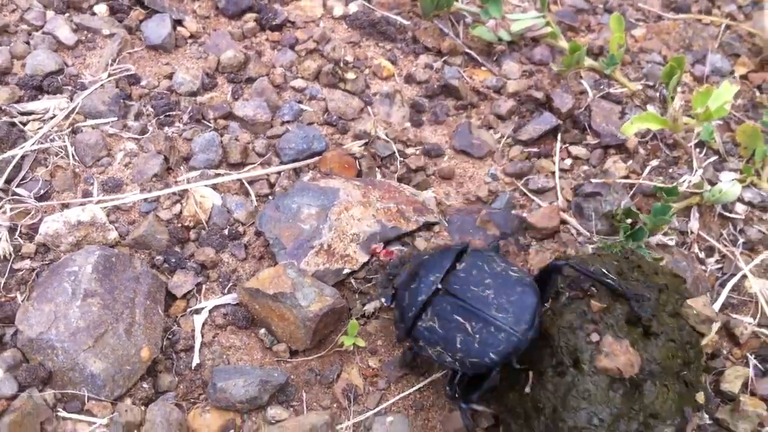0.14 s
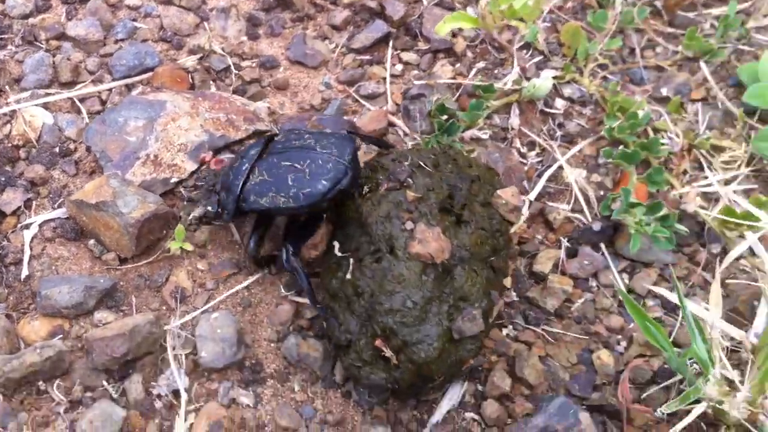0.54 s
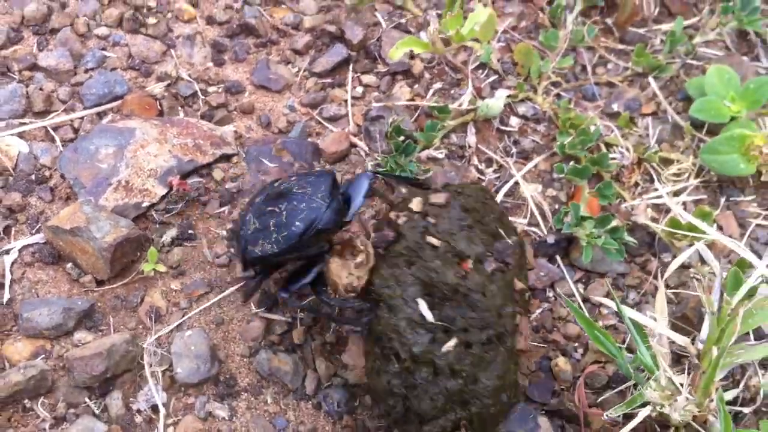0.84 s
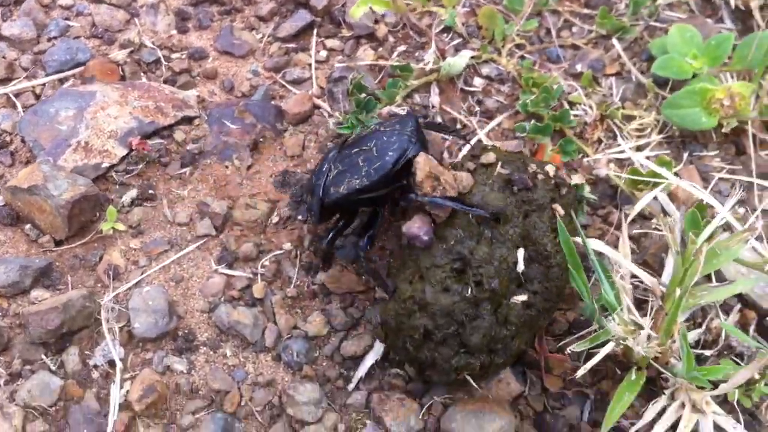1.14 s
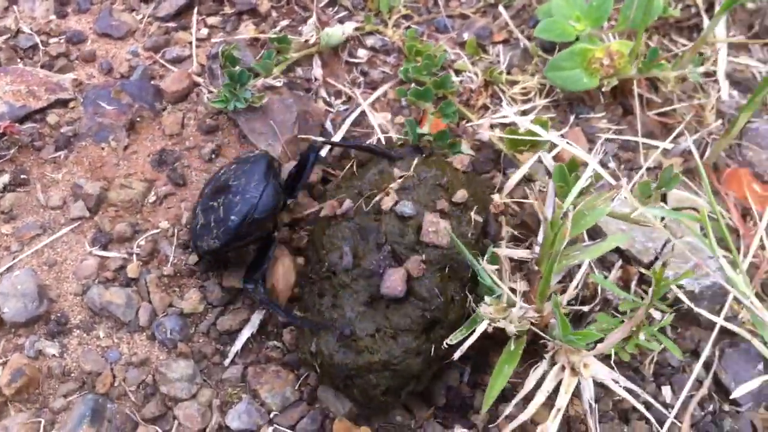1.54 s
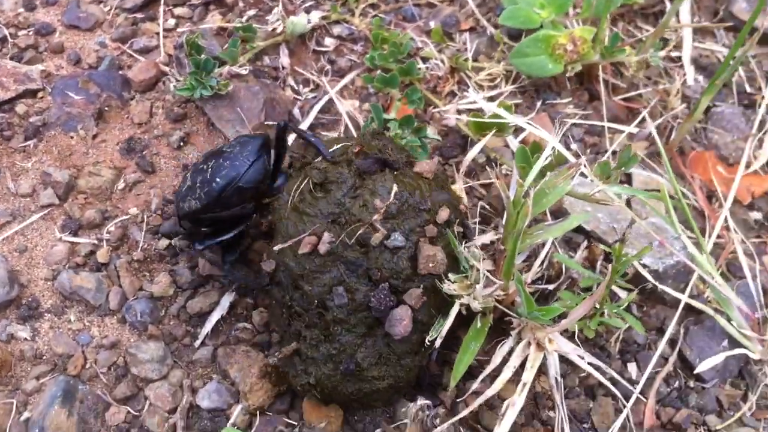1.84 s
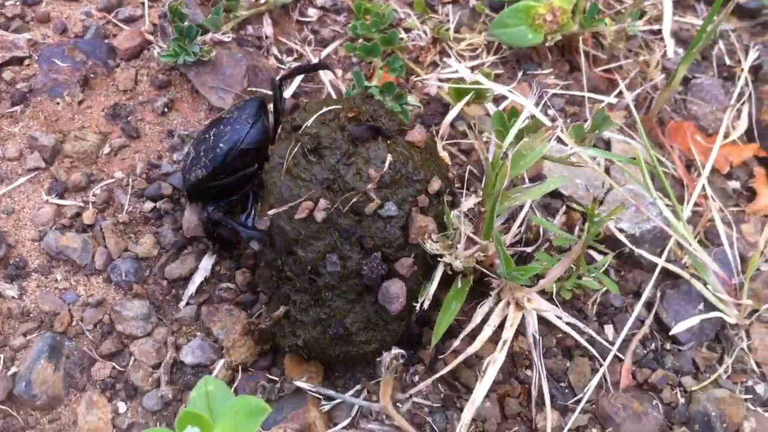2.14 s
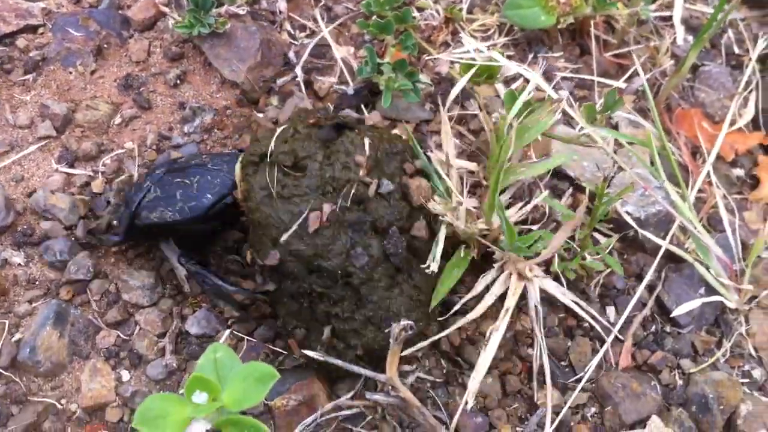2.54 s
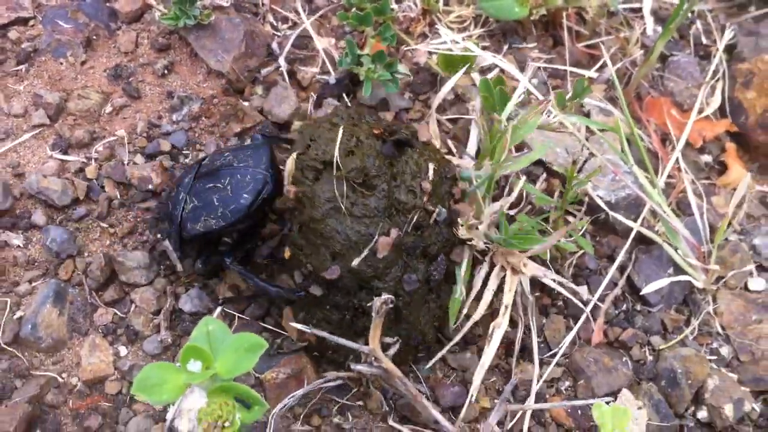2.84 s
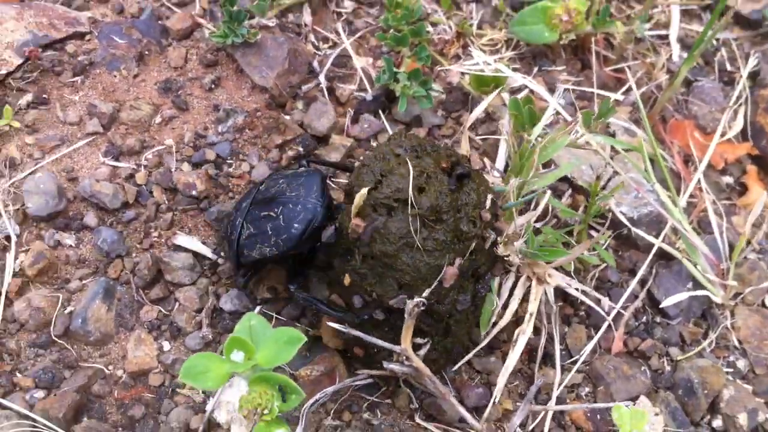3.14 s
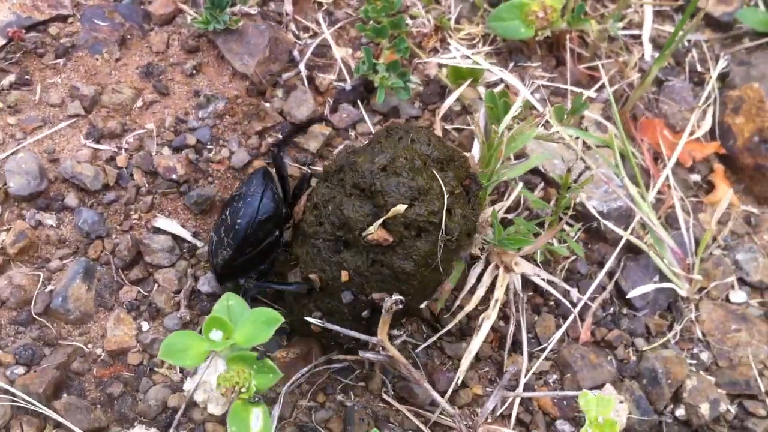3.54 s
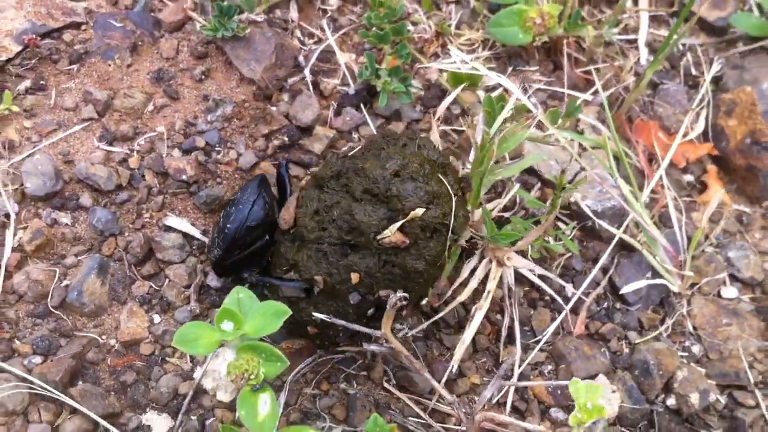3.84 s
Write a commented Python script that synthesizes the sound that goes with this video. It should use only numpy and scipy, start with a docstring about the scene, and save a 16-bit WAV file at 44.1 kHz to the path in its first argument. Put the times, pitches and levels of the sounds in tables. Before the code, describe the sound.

Wind gusts buffet the microphone in low rumbling thumps, with tiny gritty ticks over gravel.

```python
"""Stony ground outdoors, with a small microphone held close to it in gusts of wind.
Turbulence: eddies sweep past in short low thumps, brighter as they get stronger, and tight ones pop.
Friction and fracture: grit and dry stalks tick as bursts of noise where a beetle rolls its ball, and
sand grains ring as tiny decaying sines. Behind lie a soft hush and hiss, made of coloured noise,
and a few distant bird chirps, made of gliding sines."""
import sys
import numpy as np
from scipy.fft import rfft, irfft, next_fast_len
from scipy.io import wavfile
from scipy.ndimage import uniform_filter1d, map_coordinates

SR = 44100
rng = np.random.default_rng(int(sys.argv[2]) if len(sys.argv) > 2 else 0)


def transcribe(u):
    """Save the signal u as a 16-bit wav file named by the first command-line argument.

    u: samples, shape (n,) or (channels, n), limited to [-1, 1]; the rate is SR.
    q: integer samples, one column per channel.
    """
    v = np.clip(np.atleast_2d(u).T, -1, 1)
    q = np.round(v * 32767).astype(np.int16)
    wavfile.write(sys.argv[1], SR, q)


N = 176400

# wind between the buffets, before its gain and sway: time_s, level_db
WIND_LEVEL = [(0.0, -54), (0.92, -56), (1.43, -47.5), (1.56, -46.5), (1.8, -41), (2.05, -38.5), (2.27, -48),
              (2.43, -51), (2.67, -51), (3.05, -28.5), (3.25, -26.5), (3.43, -30.5), (3.6, -34),
              (4.0, -32.5)]
# single buffets on the microphone: peak_s, level_db, half_height_width_s, fineness (eddy pitch factor)
BUFFETS = [(0.104,-36.5,0.015,0.73), (0.142,-42.5,0.02,0.77), (0.182,-40.5,0.018,0.87),
           (0.325,-36,0.0147,0.88), (0.369,-43,0.0198,0.92), (0.488,-46.5,0.02478,0.96),
           (0.615,-42.5,0.01571,0.95), (0.887,-44,0.018,0.81), (0.98,-45,0.02487,0.91),
           (1.211,-20,0.0098,1.13), (1.231,-22,0.018,1.03), (1.282,-27.5,0.012,1.15), (1.319,-28,0.022,0.8),
           (1.436,-38.5,0.01622,1.26), (1.59,-31,0.024,1.16), (1.627,-27,0.023,1.015),
           (1.664,-30,0.016,0.91), (1.693,-36.5,0.015,1.234), (1.753,-32.5,0.01787,1.015),
           (1.817,-30.5,0.013,1.01), (1.888,-32.5,0.03767,0.81), (1.992,-23,0.014,1.224),
           (2.016,-30.5,0.015,0.97), (2.032,-32,0.0077,1.12), (2.044,-23,0.013,1.116),
           (2.087,-31,0.035,0.73), (2.141,-29.5,0.015,1.07), (2.166,-20.5,0.029,.85),
           (2.229,-30.5,0.017,0.86), (2.627,-26.5,0.010843,.7), (2.729,-35,0.025,0.94),
           (2.764,-32.5,0.018404,0.81), (2.827,-29.5,0.0135,1.18), (2.881,-29,0.0162,.85),
           (2.918,-21.5,0.01793,0.95), (2.941,-27,0.017,0.83), (2.974,-24.5,0.011,0.94),
           (3.006,-24.5,0.013,0.84), (3.042,-18,0.028,.9), (3.075,-14,0.017,0.87), (3.138,-11,0.01456,0.95),
           (3.164,-22,0.02508,0.89), (3.21,-20.5,0.018,.95), (3.259,-27,0.012,0.8),
           (3.308,-24,0.01419,0.96), (3.348,-17.5,0.01476,0.9), (3.387,-14.5,0.021,1.186),
           (3.414,-19.5,0.02038,0.97), (3.456,-18,0.01673,0.91), (3.539,-29,0.013,1.03),
           (3.583,-29,0.0092,1.08), (3.602,-23,0.01093,1), (3.65,-17.5,0.015,1.02), (3.684,-23,0.011,1.12),
           (3.702,-24.5,0.012,1.163), (3.743,-22,0.01914,1.11), (3.782,-29,0.0089,1.17),
           (3.803,-26.5,0.011,1.14), (3.845,-19.5,0.017,1.087), (3.869,-23,0.014,1.1),
           (3.91,-24,0.017,1.07), (3.93,-29,0.0094,0.77), (3.991,-27.5,0.022,1.01)]
# spectrum of the eddies at unit air speed, relative: frequency_hz, density_db (per Hz)
EDDY_SPECTRUM = [(30, -14), (100, 0.5), (200, 1), (340, -1), (520, -7.5), (850, -21), (1200, -38.5),
                 (1800, -46), (2800, -63), (6000, -93.5)]
WIND_GAIN_DB, SWAY_DB, FLUTTER_DB = -1.5, 3, 2.5
REFERENCE_DB, DB_PER_SPEED_DOUBLING = -20, 29  # level at unit air speed; how it grows with speed

# the microphone port: resonant bass roll-off, slow leak, and a mild resonance in the low mids
PORT_HZ, PORT_Q, LEAK_HZ = 156.6, 1.95, 91
HOLLOW_HZ, HOLLOW_Q, HOLLOW_DB = 352, 5.3, -12.5

# tight eddies that strike the port, before the common delay, gain and filters: time_s, peak_db
POPS = [(1.22, -22.5), (1.989, -32.5), (2.15, -32.5), (3.028, -24), (3.05, -22.5), (3.073, -22),
        (3.12, -16.5), (3.132, -15), (3.141, -26), (3.156, -22), (3.306, -31.5), (3.35, -27.5),
        (3.36, -24.5), (3.379, -25), (3.391, -21.5), (3.414, -25), (3.647, -29), (3.679, -35),
        (3.737, -31.5), (3.746, -39), (3.837, -29.5), (3.904, -31)]
POP_GAIN_DB, POP_HALF_WIDTH_S, POP_DELAY_S, POP_SOFT_HZ = 13, 0.00043, 0.001477, 1710

# ticks of grit, before the gains of the two parts: start_s, level_db, low_part_db (against the high part)
TICKS = [(0.302, -46, -7.5), (0.3508, -44.5, -8), (0.3715, -49, -9), (0.4541, -47, -14), (0.525, -48, -10),
         (0.5322, -42, -5.5), (0.7132, -49.5, -5.5), (0.7544, -40, -15.5), (0.832, -49, -10),
         (0.961, -49, -18), (1.1402, -46, -17), (1.2106, -44.5, -10.5), (1.364, -42, -19),
         (1.3969, -46, -11), (1.5584, -46.5, -14), (1.7884, -40.5, -9), (1.8225, -41.5, -29),
         (1.8965, -47, -14.5), (2.5118, -38.5, -16), (2.5493, -43, -16.5), (2.5643, -46, -16),
         (2.582, -47.5, -15), (2.6256, -37, -9), (2.6647, -36, -15), (2.6931, -38, -20.5),
         (2.7786, -45.5, -16), (2.824, -45, -9), (2.8952, -44, -14), (3.0044, -44.5, -17),
         (3.0148, -38, -13), (3.2452, -43.5, -20), (3.2682, -35, -28), (3.421, -46, -21),
         (3.4311, -41.5, -10.5), (3.7103, -43.5, -17)]
# spectrum of the crisp part of a tick, relative: frequency_hz, density_db (per Hz)
TICK_HIGH_SPECTRUM = [(2000, -9), (6000, -15.5), (8000, -7), (10700, 3.5), (13500, -5.5), (15500, -9.5)]
# spectrum of the duller part of a tick, relative: frequency_hz, density_db (per Hz)
TICK_LOW_SPECTRUM = [(400, -18.5), (1300, 5.5), (2200, -3.5), (3200, 4), (4000, -2.5), (4800, 4),
                     (5800, -3.5), (7500, -16), (12000, -38)]
TICK_ATTACK_S, TICK_T60_S = 0.00071, 0.017
TICK_HIGH_GAIN_DB, TICK_LOW_GAIN_DB, TICK_ROUGH_DB = -3, 6.5, -3

# the ball scraping over the ground: middle_s, half_height_width_s, level_db
SCRAPES = [(0.518, .17, -74), (2.555, .07, -65), (2.651, 0.11, -60), (2.819, 0.061, -66),
           (3.03, 0.043, -63), (3.439, 0.032, -62)]
GRAINS_PER_S, CREEP_DB = 1800, -75
GRAIN_HZ, GRAIN_LOG_SPREAD, GRAIN_DECAY_S, GRAIN_SCATTER_DB = 11450, 0.25, 0.00018, 7

# distant chirps: start_s, length_s, start_hz, end_hz, peak_db
CHIRPS = [(.95, .09, 3020, 2970, -64), (1.325, .05, 5500, 4750, -63), (1.45, .11, 3650, 4400, -73)]

# spectrum of the outdoor hush, relative: frequency_hz, density_db (per Hz)
HUSH_SPECTRUM = [(30, -25), (60, -26), (110, -25.5), (200, -3), (380, -3), (480, -8), (660, -2),
                 (780, -1.5), (900, 2), (1020, -5), (1220, -15.5), (1600, -15), (2400, -22.5),
                 (4000, -29.5), (9000, -57)]
# level of the hush before its gain and wobble: time_s, level_db
HUSH_LEVEL = [(0.0, -60), (1.24, -55.5), (1.52, -55), (2.25, -55.5), (2.59, -53.5), (2.85, -55.5)]
# spectrum of the fine hiss, relative: frequency_hz, density_db (per Hz)
HISS_SPECTRUM = [(1000, -4), (2500, -7.5), (3600, 4.5), (4200, 0.5), (4900, 3), (5800, -1), (7300, -3),
                 (9000, 0), (11200, 0.5), (13000, -5), (15500, -5)]
# level of the hiss before its wobble: time_s, level_db
HISS_LEVEL = [(0, -67), (.3, -65.5), (.55, -64.5), (1.4, -64.5), (2.5, -64), (3.2, -66), (4, -65)]
HUSH_GAIN_DB = 2.5

LOW_CUT_HZ, TOP_HZ = 47, 15750  # band kept by the camera


def amp(db):
    """Decibel law: twenty decibels are a factor of ten in amplitude."""
    return 10 ** (np.asarray(db) / 20)


def unit(x):
    """Normalisation: x scaled to rms 1."""
    return x / np.sqrt(np.mean(x ** 2) + 1e-20)


def curve(rows):
    """Linear interpolation: one value per sample from (time_s, value) points."""
    return np.interp(np.arange(N) / SR, *np.transpose(rows))


def wobble(knots_per_s):
    """Slow random modulation: a smooth curve through random knots."""
    knots = rng.standard_normal(N // 8)
    return map_coordinates(knots, [np.arange(N) * knots_per_s / SR], mode="wrap")


def filtered(x, response):
    """Linear filtering: the spectrum of x times a complex response of frequency."""
    m = next_fast_len(N + SR // 2)  # padded against wrap-around
    return irfft(rfft(x, m) * response(np.fft.rfftfreq(m, 1 / SR)), m)[:N]


def noise(spectrum):
    """Coloured noise: white noise shaped by (frequency_hz, density_db) points, at rms 1."""
    f, db = np.transpose(spectrum)
    white = rng.standard_normal(N)
    return unit(filtered(white, lambda hz: amp(np.interp(np.log(hz + 1), np.log(f), db))))


def swell(middle_s, width_s):
    """Gaussian envelope: a bell that stays above half height for the given width."""
    half_widths = 2 * (np.arange(N) / SR - middle_s) / width_s
    return 2 ** -np.minimum(half_widths ** 2, 100)


def evened(x, size):
    """Level equalisation: x divided by its short-term rms."""
    power = uniform_filter1d(uniform_filter1d(x ** 2, size), size)
    return x / np.sqrt(np.abs(power) + 1e-12)


def wind():
    """Frozen turbulence: a pattern of eddies is carried past; faster air is louder and higher."""
    power = amp(curve(WIND_LEVEL) + WIND_GAIN_DB + SWAY_DB * wobble(28)) ** 2
    fine_power = power
    for peak_s, level_db, width_s, fineness in BUFFETS:
        buffet = (amp(level_db) * swell(peak_s, width_s)) ** 2
        power = power + buffet
        fine_power = fine_power + fineness * buffet
    pressure = np.sqrt(power)
    flutter = amp(FLUTTER_DB * wobble(260))
    level_db = 20 * np.log10(pressure * flutter)
    speed = 2 ** ((level_db - REFERENCE_DB) / DB_PER_SPEED_DOUBLING)
    mean_fineness = fine_power / power
    # the place in the eddy pattern that has reached the microphone
    travelled = np.cumsum(speed * mean_fineness)
    eddies = map_coordinates(noise(EDDY_SPECTRUM), [travelled], mode="wrap")
    return pressure * evened(filtered(eddies * flutter, port), size=600)


def port(hz):
    """Resonance: the microphone's bass rolls off past a peak, and its low mids ring slightly hollow."""
    resonant = -hz ** 2 / (PORT_HZ ** 2 - hz ** 2 + 1j * hz * PORT_HZ / PORT_Q)
    leak = 1j * hz / (LEAK_HZ + 1j * hz)
    damping = 1j * hz * HOLLOW_HZ / HOLLOW_Q
    hollow = damping / (HOLLOW_HZ ** 2 - hz ** 2 + damping)
    return resonant * leak * (1 + amp(HOLLOW_DB) * hollow)


def pops():
    """Vortex core: the centre of a tight eddy is a brief, rounded dip in pressure."""
    t = np.arange(N) / SR
    dips = np.zeros(N)
    for time_s, peak_db in POPS:
        offset = (t - time_s - POP_DELAY_S) / POP_HALF_WIDTH_S
        dips -= amp(peak_db + POP_GAIN_DB) / (1 + offset ** 2)
    return filtered(dips, lambda hz: port(hz) / np.sqrt(1 + (hz / POP_SOFT_HZ) ** 4))


def ticks():
    """Impulsive fracture: small stones and stalks snap in a quick burst with a high and a low part."""
    high = unit(noise(TICK_HIGH_SPECTRUM) * amp(TICK_ROUGH_DB * wobble(900)))
    low = unit(noise(TICK_LOW_SPECTRUM) * amp(TICK_ROUGH_DB * wobble(900)))
    out = np.zeros(N)
    for start_s, level_db, low_part_db in TICKS:
        t = np.maximum(np.arange(N) / SR - start_s, 0)
        attack = 1 - np.exp(-t / TICK_ATTACK_S)
        decay = amp(-60 * np.minimum(t / TICK_T60_S, 2))
        burst = amp(TICK_HIGH_GAIN_DB) * high + amp(low_part_db + TICK_LOW_GAIN_DB) * low
        out += attack * decay * amp(level_db) * burst
    return out


def scrapes(size=128):
    """Granular friction: sand grains, each with its own pitch, shift steadily, louder as the ball slides."""
    starts = np.flatnonzero(rng.random(N) < GRAINS_PER_S / SR)
    pitch, strength = rng.standard_normal((2, N))[:, starts, None]
    t = np.arange(size) / SR
    hz = np.minimum(GRAIN_HZ * np.exp(GRAIN_LOG_SPREAD * pitch), SR / 2)
    ringing = np.exp(-t / GRAIN_DECAY_S) * np.sin(2 * np.pi * hz * t)
    grains = amp(GRAIN_SCATTER_DB * strength) * ringing
    # add every grain at its own start
    places = starts[:, None] + np.arange(size)
    sand = np.bincount(places.ravel(), grains.ravel(), N)[:N]
    sliding = sum(amp(level_db) * swell(middle_s, width_s) for middle_s, width_s, level_db in SCRAPES)
    return unit(sand) * (amp(CREEP_DB) + sliding)


def birds():
    """Frequency modulation: short whistles from far away glide in pitch with a slight waver."""
    out = np.zeros(N)
    for start_s, length_s, start_hz, end_hz, peak_db in CHIRPS:
        progress = np.clip((np.arange(N) / SR - start_s) / length_s, 0, 1)
        glide = start_hz + (end_hz - start_hz) * progress
        hz = glide * (1 + 0.00684 * wobble(320))
        out += amp(peak_db) * np.sin(np.pi * progress) * np.sin(2 * np.pi * np.cumsum(hz) / SR)
    return out


def background():
    """Diffuse noise: the open-air hush lies under a fine hiss, both gently varying in level."""
    hush_level = amp(curve(HUSH_LEVEL) + HUSH_GAIN_DB + 1.2 * wobble(10))
    hiss_level = amp(curve(HISS_LEVEL) + 0.51 * wobble(12))
    return hush_level * noise(HUSH_SPECTRUM) + hiss_level * noise(HISS_SPECTRUM)


def scene():
    """Superposition: the pressures of all sources add, in one channel."""
    return (wind() + pops() + ticks() + scrapes() + birds() + background())[None]


def record(dry):
    """Band limiting: the camera drops the deepest bass and keeps nothing above its band limit."""
    def band(hz):
        low_cut = hz ** 2 / np.sqrt(hz ** 4 + LOW_CUT_HZ ** 4)
        return (hz < TOP_HZ) * low_cut
    return filtered(dry[0], band)[None]


dry = scene()
out = record(dry)
transcribe(out)
```